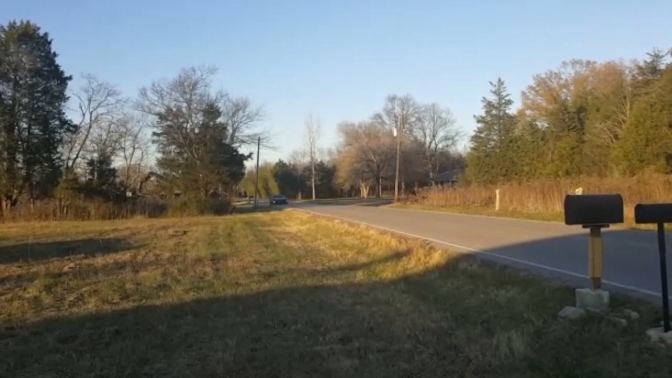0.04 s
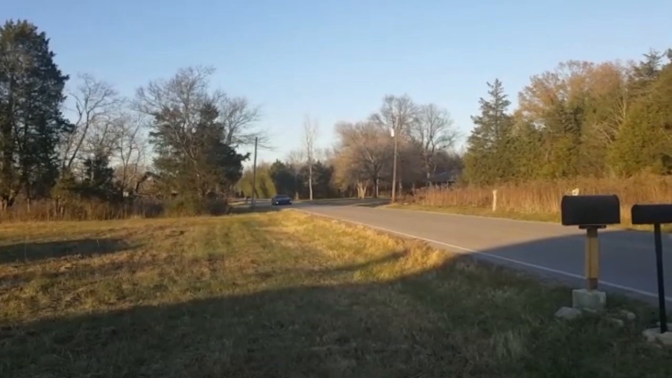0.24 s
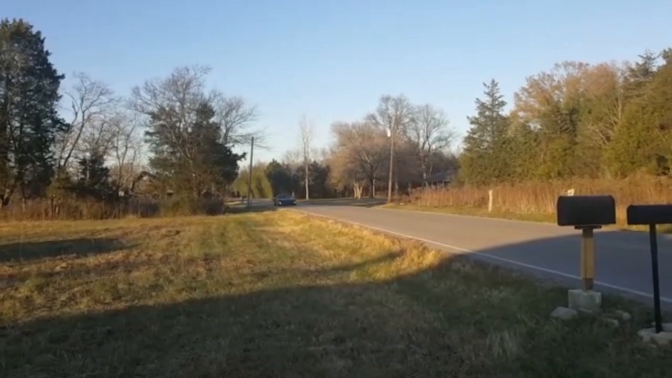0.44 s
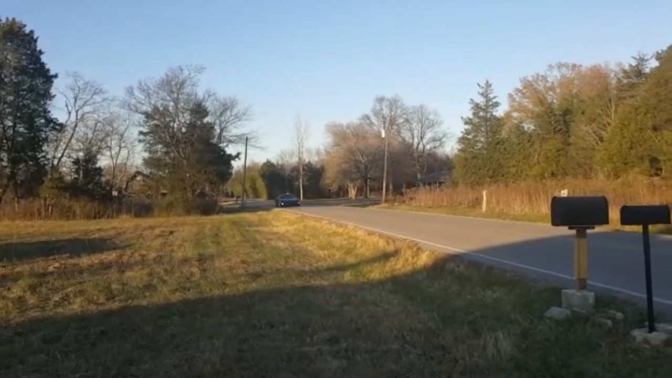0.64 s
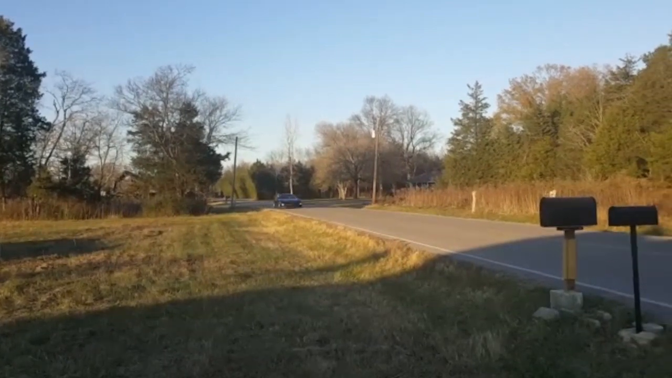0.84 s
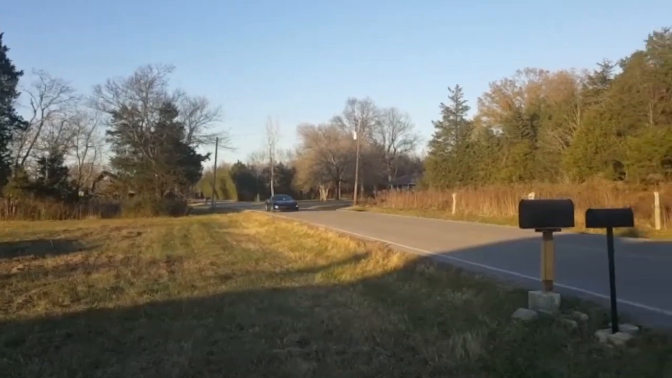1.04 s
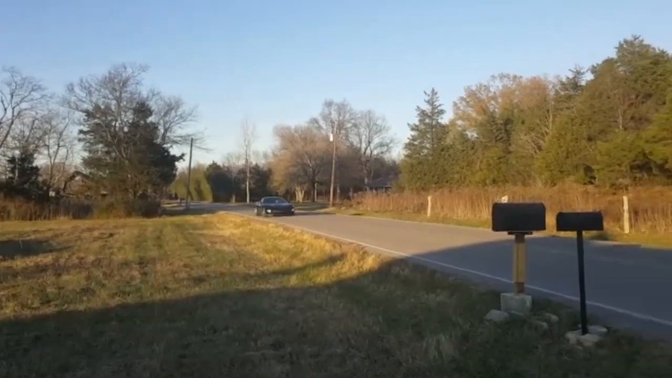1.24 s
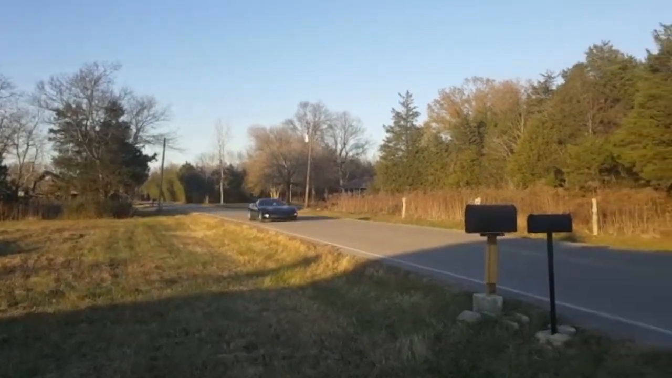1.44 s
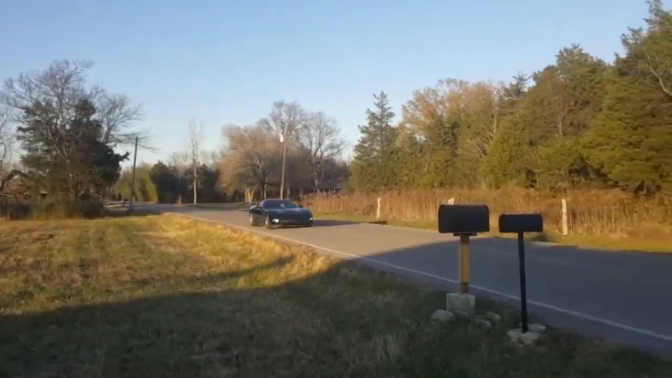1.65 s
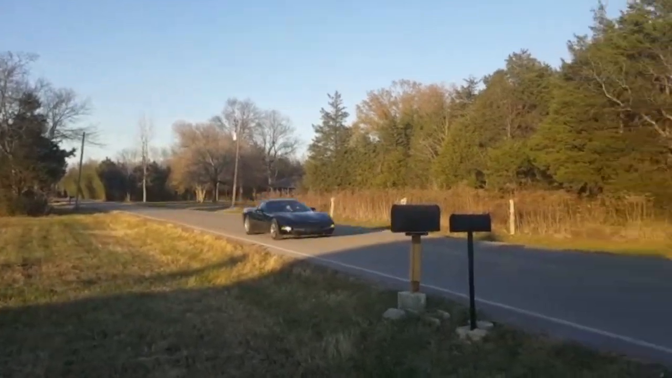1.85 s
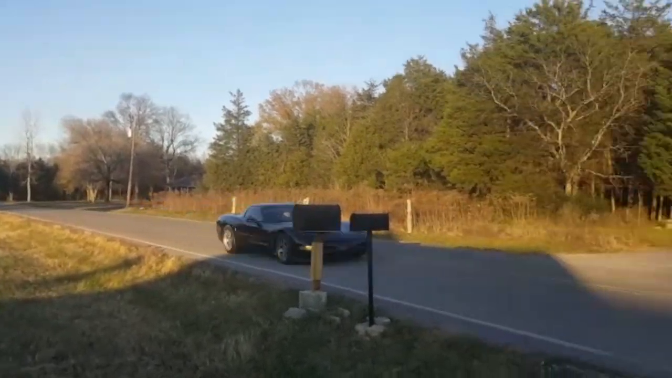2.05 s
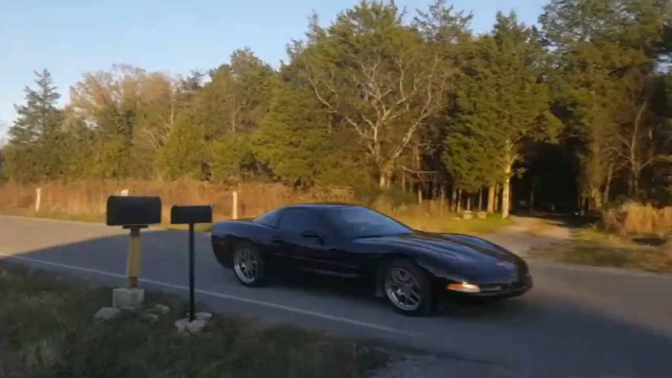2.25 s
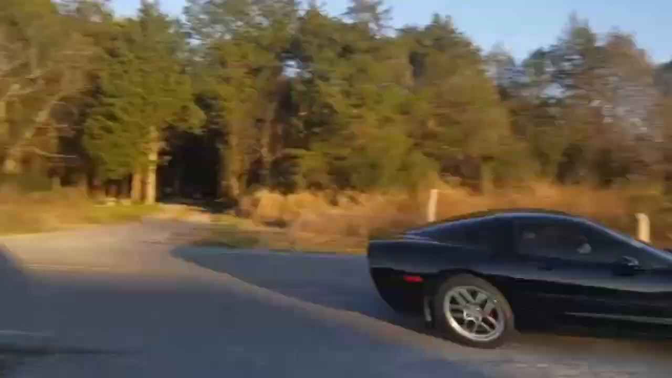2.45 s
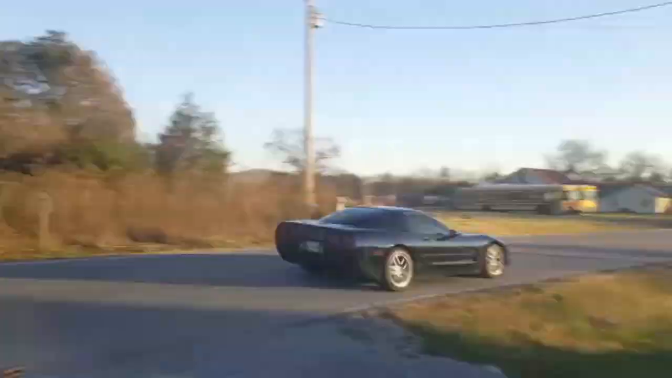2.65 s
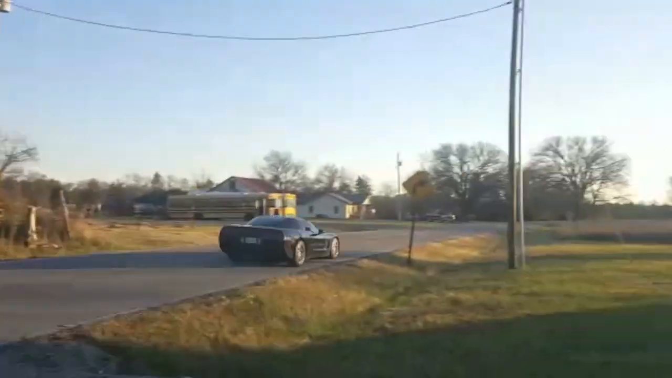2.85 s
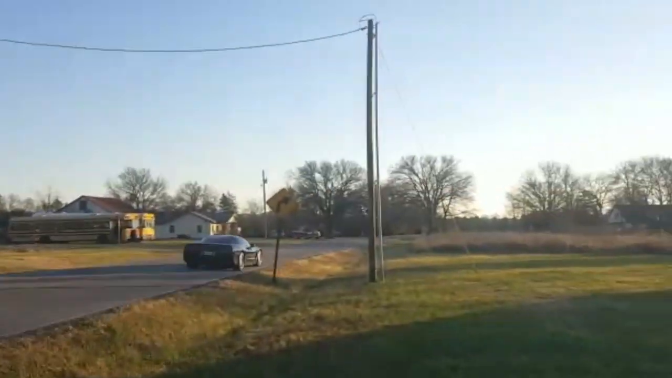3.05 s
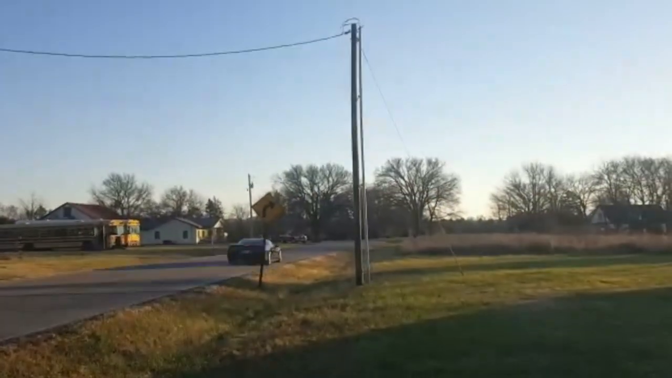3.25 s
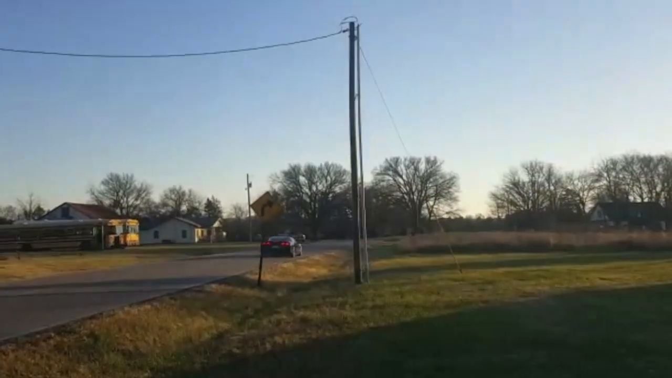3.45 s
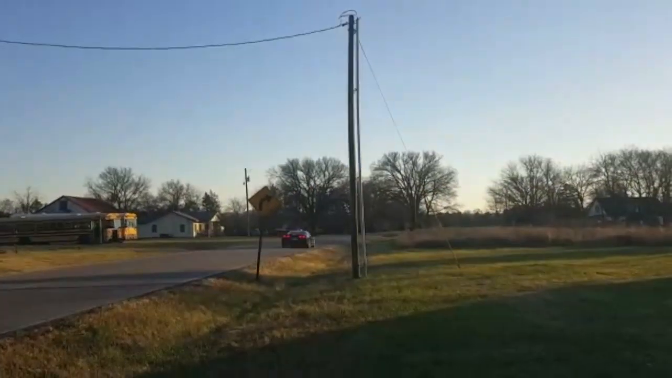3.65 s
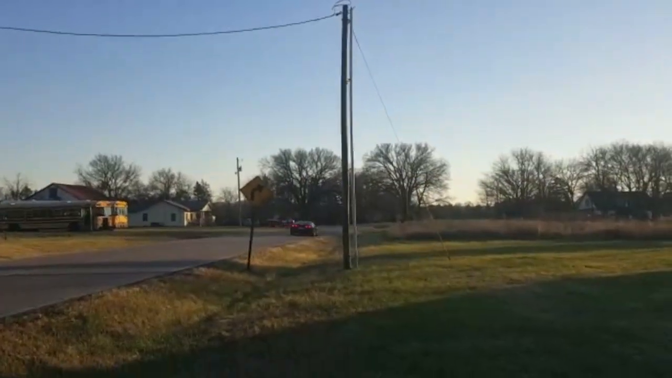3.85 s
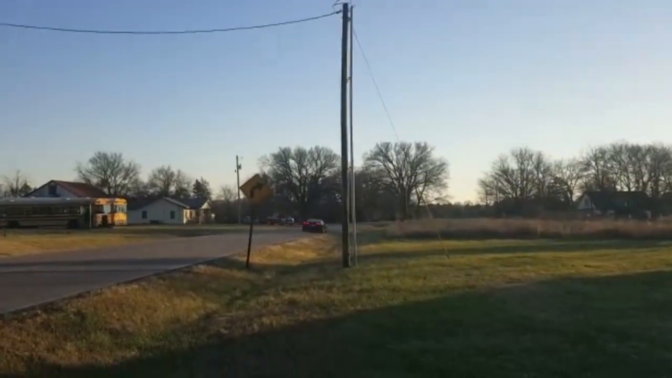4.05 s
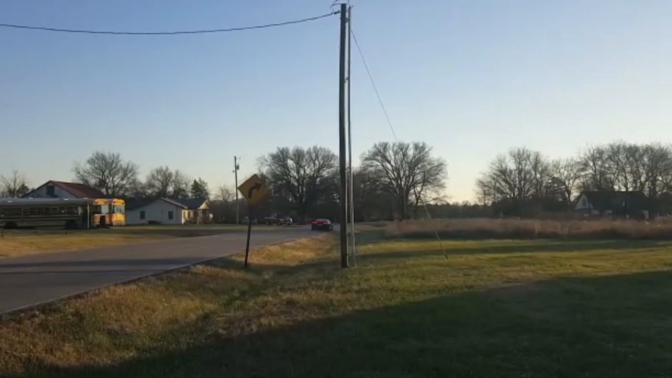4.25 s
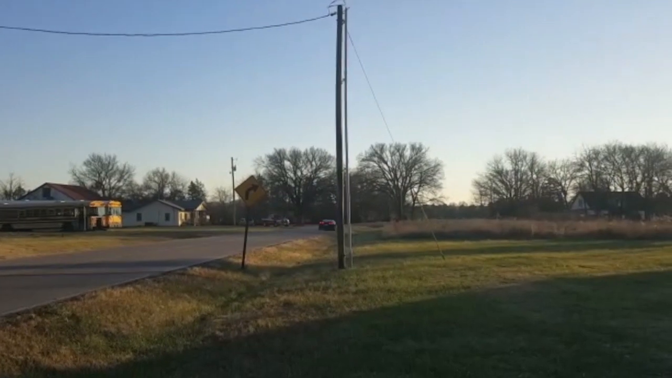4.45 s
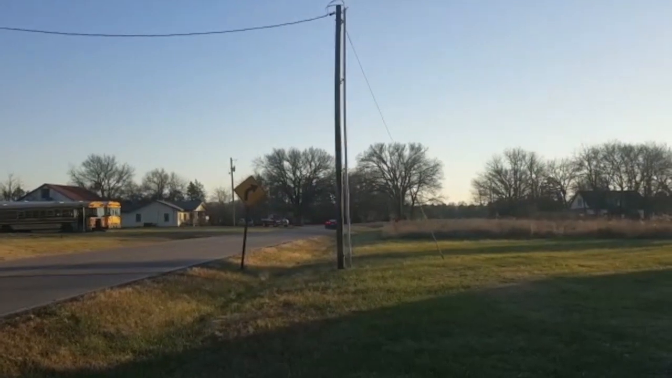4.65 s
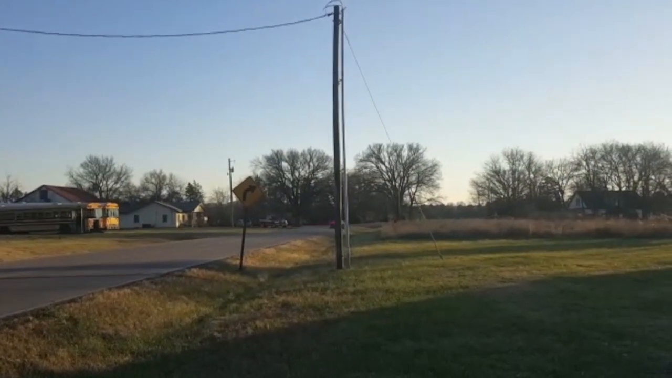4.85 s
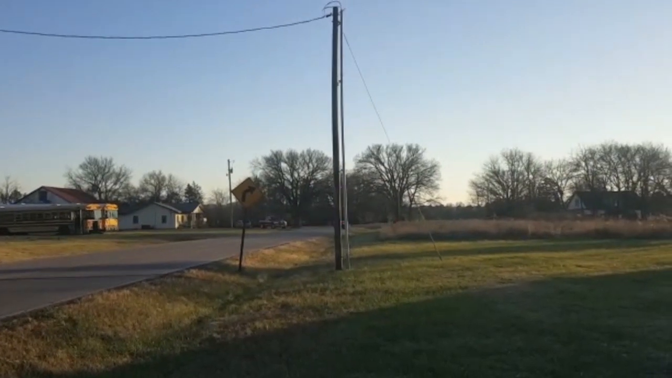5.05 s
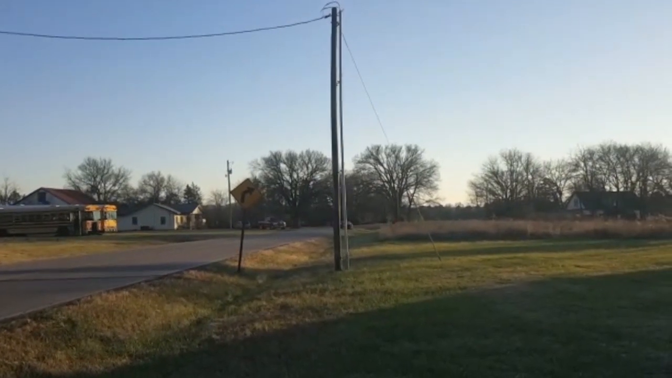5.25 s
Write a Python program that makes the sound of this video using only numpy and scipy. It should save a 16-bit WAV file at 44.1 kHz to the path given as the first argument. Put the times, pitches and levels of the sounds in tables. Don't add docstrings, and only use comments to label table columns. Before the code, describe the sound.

Outdoors on a country road between trees, the first 0.8 seconds hold only faint field air and a very distant low engine hum. At about 0.9 the throttle cracks open with sharp pops, and an unmuffled eight-cylinder exhaust swells, raspy and booming, its pitch climbing. From 1.3 to 2.4 a mid-high howl and thin pure tones sing over the roar. Around 2.5 the car is abreast, very close: a brief bright blast of tyre hiss, wind gust and rumble, with pitch dropping quickly through 2.7. A short dip follows as the throttle shuts, then from 2.9 to 3.8 bright, uneven crackling pops with whistling overtones. Hollow thumps at 3.85 to 3.95 mark the change to coasting. The engine sags into a lower, lumpy burble with soft whistles; a cluster of small hollow pipe knocks comes at 5.0 to 5.3. It remains audible to the end, with dull tree echoes throughout.

```python
import sys
import numpy as np
from scipy import signal
from scipy.fft import rfft, irfft, next_fast_len
from scipy.io import wavfile
from scipy.ndimage import uniform_filter1d

SR = 44100
rng = np.random.default_rng(int(sys.argv[2]) if len(sys.argv) > 2 else 0)


def amplitude_ratio(level_db):
    exponent = np.asarray(level_db, float) / 20
    return 10 ** exponent


def unload_audio(sound):
    columns = np.transpose(np.atleast_2d(sound))
    steps = np.round(np.clip(columns, -1, 1) * 32767)
    wavfile.write(sys.argv[1], SR, steps.astype(np.int16))


N = 234283
SIZE = next_fast_len(N + 4096)
HZ = np.fft.rfftfreq(SIZE, 1 / SR) + 1
SPIKE_S = 2.177

# (time [s], stage [0 pull, 1 close, 2 overrun, 3 coast])
STAGE = [(0, 2), (.8, 2), (.86, 0), (1.8, 0), (2.1, 1), (2.65, 1), (2.85, 2), (3.82, 2), (3.93, 3),
         (5.31, 3)]


def rms_one(x):
    return x / np.sqrt(np.mean(x ** 2) + 1e-20)


def in_time(rows):
    s, *columns = np.transpose(rows)
    return [np.interp(np.arange(N) / SR, s, c) for c in columns]


def by_stage(values):
    return np.interp(in_time(STAGE)[0], np.arange(len(values)), values)


def at_hz(points):
    hz, value = np.transpose(points)
    return np.interp(np.log(HZ), np.log(hz), value)


def colour(x, spectrum, low_hz, high_hz):
    band = 1 / (1 + (low_hz / HZ) ** 16) / (1 + (HZ / high_hz) ** 24)
    shaped = rfft(x, SIZE) * amplitude_ratio(at_hz(spectrum)) * band
    return rms_one(irfft(shaped, SIZE)[..., :N])


def drift(rate):
    steps = rng.standard_normal(400)
    return np.interp(np.arange(N) / SR * rate, np.arange(len(steps)), steps)


def bursts(rows, rise_db_per_s, fall_db_per_s):
    t = np.arange(N) / SR
    gain = 0
    for s, hold, db in rows:
        before, after = np.maximum(s - t, 0), np.maximum(t - s - hold, 0)
        gain = gain + amplitude_ratio(db - rise_db_per_s * before - fall_db_per_s * after)
    return gain


def engine_cycle():
    # (time [s], cycle rate [Hz])
    speed = [(0, 34.13), (.7, 33.64), (.87, 35.55), (.96, 34.85), (1.31, 36.81), (1.9, 39.63), (2.2, 40.93),
             (2.38, 41.19), (2.52, 40.55), (2.69, 35.43), (2.8, 35.75), (2.91, 34.8), (3.45, 34.07),
             (3.85, 33.57), (3.98, 32.6), (4.15, 32.32), (4.57, 30.56), (5.31, 28.38)]
    main_pop_s, coast_step_cycles = 3.2205, .26
    rate, = in_time(speed)
    cycle = np.cumsum(rate) / SR
    cycle -= cycle[round(main_pop_s * SR)]
    return cycle + by_stage([0, 0, 0, coast_step_cycles])


def boom(cycle, bark_db):
    # (multiple of the cycle, level [dB])
    pull = [(1, -43), (2, -20), (3, -13.5), (4, -11), (5, -2), (6, -1.5), (7, -1.5), (8, -1), (9, -39.5),
            (10, -27), (11, -16), (12, -21), (13, -7.5), (14, -22), (15, -35), (16, -11), (17, -26),
            (18, -14), (19, -28), (20, -6), (21, -14), (22, -14.5), (23, -40), (24, -27), (25, -17),
            (26, -13.5), (27, -8), (28, -27), (29, -9.5), (30, -11)]
    close = [(1, -55.5), (2, -26), (3, -16.5), (4, -20.5), (5, -15), (6, -7.5), (7, -19), (8, 0), (9, -15),
             (10, -14.5), (11, -11), (12, -26.5), (13, -20.5), (14, -9), (15, -32), (16, -5.5), (17, -27),
             (18, -26.5), (19, -9.5), (20, -41), (21, -48), (22, -2.5), (23, -11.5), (24, -4.5),
             (25, -22.5), (26, -18), (27, -41), (28, -25), (29, -40), (30, -7.5)]
    overrun = [(1, -46), (2, -40), (3, -12.5), (4, -7.5), (5, -0.5), (6, 0), (7, -6.5), (8, -12),
               (9, -23.5), (10, -14), (11, -28), (12, -23.5), (13, -20), (14, -40), (15, -15.5),
               (16, -12.5), (17, -34.5), (18, -13), (19, -36), (20, -8), (21, -10.5), (22, -8), (23, -13.5),
               (24, -8), (25, -11.5), (26, -17), (27, -33.5), (28, -27), (29, -30), (30, -30)]
    coast = [(1, -37.5), (2, -29), (3, -16.5), (4, -7), (5, -8), (6, 3), (7, -15), (8, 0), (9, -12),
             (10, -28), (11, -53), (12, -17.5), (13, -45.5), (14, -18), (15, -44), (16, -20.5), (17, -33),
             (18, -34.5), (19, -18), (20, -38.5), (21, -12), (22, -21), (23, -15), (24, -22.5), (25, -21),
             (26, -17), (27, -29), (28, -17.5), (29, -15), (30, -36)]
    # (time [s], burble of uneven firing [dB], even firing tone [dB])
    boom_levels = [(0, -47.5, -70), (.8, -37.5, -65), (.9, -32, -29.5), (1.28, -23.5, -29.5),
                   (1.74, -22.5, -19.5), (1.94, -21.5, -15), (2.14, -26, -13), (2.34, -28, -20),
                   (2.45, -29.5, -7), (2.69, -27.5, -10), (2.8, -20.5, -29), (3.12, -25.5, -46.5),
                   (3.45, -21, -30), (3.85, -20, -36), (4.1, -21.5, -18), (4.64, -20, -16.5),
                   (5.1, -23, -12), (5.31, -27, -17)]
    low_trim = [-2.5, -3.5, -0.5, -0.5]
    high_trim = [-5.5, -3.5, -6, 4]
    # (time [s], level [dB])
    facing = [(2.36, -8.5), (2.5, 12), (2.85, 8.5), (3.0, 0)]
    scattering = [.9, .9, 0, np.pi / 2]
    spiking = [1, 1, 0, 0]
    ringing_out = [1, 1, 1, 0]
    # (time [s], half length [s], level [dB])
    order_swells = [(0.51, 0.43, -18), (3.04, 0.096, 5), (5.07, 0.34, -6.5), (5.7, 0.39, 13.5),
                    (0.84, 0.8, 11.5), (2.35, 0.08, 10.5), (2.36, 0.068, 10), (2.54, 0.046, 13),
                    (2.81, 0.07, 15.5), (2.55, 0.037, -3.5), (2.61, 0.0075, 5.5), (2.66, 0.0081, -5.5),
                    (2.78, 0.015, -12), (2.62, 0.031, -7), (2, 0.012, -12), (4.1, 0.071, -8.5),
                    (2.78, 0.041, -9), (2, .06, -3), (2.11, 0.043, 6.5), (2.38, .08, -7.5),
                    (2.435, 0.018, -4.5), (2.42, .04, 9.5), (2.21, 0.2, 3), (2.2, 0.15, 3), (2.48, .02, 7.5)]
    swelling_orders = [6, 6, 6, 5, 16, 16, 24, 24, 7, 8, 8, 8, 8, 22, 16, 14, 10, 11, 22, 22, 24, 19, 16,
                       24, 24]

    tables = np.array([pull, close, overrun, coast])
    burble_db, firing_db = in_time(boom_levels)
    burble_db = burble_db - by_stage(tables[:, 4:6, 1].mean(axis=1))
    low_db, high_db = burble_db + by_stage(low_trim), bark_db + by_stage(high_trim)
    facing_db, spread = in_time(facing)[0], by_stage(scattering)
    in_step, ring_out = by_stage(spiking), by_stage(ringing_out)
    unsteady = by_stage([.5, .4, 1, .6])
    t, spike_at, out = np.arange(N) / SR, round(SPIKE_S * SR), np.zeros(N)
    for k in range(1, tables.shape[1] + 1):
        own_db = by_stage(tables[:, k - 1, 1])
        if k == 8:
            level_db = firing_db + .9 * drift(25)
        elif k in (5, 6):
            level_db = own_db + burble_db + .9 * drift(25)
        else:
            guide_db = low_db if k <= 12 else high_db
            level_db = own_db + guide_db + (2.74 if k % 8 else 1.1) * unsteady * drift(14)
        for order, (s, half, db) in zip(swelling_orders, order_swells):
            if order == k:
                level_db += db * np.exp(-((t - s) / half) ** 2)
        level_db += facing_db * (9 <= k <= 13 or k == 19)
        ringing = ring_out * np.arctan((k - 5.4) / .35) + spread * (min(k, 9) - 6) ** 2
        ringing += (1 - ring_out) * (2 * np.pi * k * .07 - np.pi)
        scramble = (k > 12) * k ** 2
        slip = 0.0074 * k * drift(20) + scramble
        if k >= 8:
            spike = 2 * np.pi * k * cycle[spike_at] + scramble
            ringing += in_step * ((spike - ringing[spike_at] + np.pi) % (2 * np.pi) - np.pi)
        out += np.sqrt(2) * amplitude_ratio(level_db) * np.cos(2 * np.pi * k * cycle - ringing + slip)
    return out


def blowdown(cycle):
    # (place [0-1], level in pull, close, overrun, coast [dB])
    pops = [
        (0, -1.5, -3, 0, 0),
        (.125, -4, -4, -14, -11),
        (.22, -3, -3, -6, -5),
        (.375, -4, -4, -13, -10),
        (.53, -1.5, -3, -7, -2),
        (.64, -4, -4, -12, -9),
        (.78, -4, -3, -10, -5),
        (.875, -4, -4, -14, -9),
    ]
    scatter = [1.2, 1.2, 1.2, 2.5]
    # (time [s], level over the main pop [dB])
    stray_pops = [
        (.884, 11),
        (.912, 8),
        (.916, 8),
        (3.293, -1),
        (3.3435, -1),
        (3.2205, 2),
        (3.944, 6),
        (4.0656, 1),
        (4.1574, 2),
    ]
    # (time [s], share [0-1])
    pop_share = [(0, .1), (.85, .1), (.9, .65), (2.6, .6), (2.95, .8), (3.8, .75), (3.95, .6), (4.5, .5),
                 (5.1, .55), (5.31, .55)]
    clicks = np.zeros(N)
    turns = np.arange(int(cycle[0]) + 1, int(cycle[-1]))
    chance = rng.standard_normal((len(pops), len(turns), 2))
    for (place, *stage_db), luck in zip(pops, chance):
        at = np.searchsorted(cycle, turns + place + .0015 * luck[:, 0])
        clicks[at] += amplitude_ratio(by_stage(stage_db)[at] + by_stage(scatter)[at] * luck[:, 1])
    for s, level_db in stray_pops:
        clicks[round(s * SR)] += amplitude_ratio(level_db)
    fade = np.exp(-1 / (.0011 * SR))
    puffs = signal.lfilter([1], [1, -fade], clicks) * .6 * rng.standard_normal((2, N))
    puffs = puffs + 3.2 * clicks
    swing = 1.2 * drift(5)
    for weight in (np.cos(swing), np.sin(swing)):
        scattered = .6 * rng.standard_normal(200) * fade ** np.arange(200)
        puffs += np.convolve(clicks * weight, scattered)[:N]
    even = np.sqrt(uniform_filter1d(puffs[0] ** 2, size=6000))
    bright = signal.lfilter(*signal.butter(2, [3000, 15000], "band", fs=SR), puffs)
    puffs = bright + by_stage([.3, .3, .1, .9]) * puffs
    share = in_time(pop_share)[0]
    turbulence = rng.standard_normal((2, N))
    return np.sqrt(share) * puffs / (even + 1e-9) + np.sqrt(1 - share) * turbulence


def roar(gas, *bands_db):
    # (frequency [Hz], level [dB per Hz])
    front = [(180, -35), (300, 12.5), (331, 5), (354, -7), (398, -25.5), (633, -11.5), (1360, -11.5),
             (1550, -10.5), (1660, -9.5), (2640, -21.5), (3490, -30), (5000, -36.5), (8280, -55.5),
             (9200, -54.5), (10600, -66), (11900, -49), (15800, -62)]
    rear = [(180, -31.5), (300, -25.5), (391, 11), (447, -11), (699, -8), (1080, -1), (1470, -5.5),
            (1770, -6), (2110, -5), (3060, -9.5), (4200, -15.5), (5000, -23.5), (6300, -29.5),
            (7130, -42.5), (8280, -36), (9200, -54.5), (10400, -71.5), (15800, -59)]
    behind = np.clip(in_time(STAGE)[0] - 1, 0, 1)
    edges_hz, out = [(420, 2050), (2250, 6900), (6900, 9400)], 0
    for (low, high), level_db in zip(edges_hz, bands_db):
        blend = (1 - behind) * colour(gas, front, low, high) + behind * colour(gas, rear, low, high)
        out = out + amplitude_ratio(level_db - 0.5 + 1.74 * drift(13) + 1.0 * drift(40)) * blend
    return out


def crackle(cycle, rasp_db, distance_m):
    # (place [0-1], level [dB], scatter [dB])
    fronts = [
        (0, 0, 1.3),
        (.21, -6, 2.5),
        (.5, -10, 3.5),
    ]
    pitches = [3300, 3900, 4500, 5300]
    over_rasp = [-30, 0, 14.5, -4]
    fade_s, air_db_per_m = .00045, .09
    level_db = rasp_db + by_stage(over_rasp) - air_db_per_m * distance_m
    turns = np.arange(int(cycle[0]) + 1, int(cycle[-1]))
    clicks = np.zeros((len(pitches), N)) + 1e-18
    for place, db, scatter_db in fronts:
        luck = rng.standard_normal((len(turns), 2))
        at = np.searchsorted(cycle, turns + place + .04 * place * luck[:, 1])
        clicks[rng.integers(0, len(pitches), len(turns)), at] = amplitude_ratio(db + scatter_db * luck[:, 0])
    r, rung = np.exp(-1 / (fade_s * SR)), 0
    for hz, pitch_clicks in zip(pitches, clicks):
        w = 2 * np.pi * hz / SR
        rung = rung + signal.lfilter([0, np.sin(w)], [1, -2 * r * np.cos(w), r * r], pitch_clicks)
    strong = np.maximum(clicks.sum(axis=0) - .4, 1e-18)
    top = signal.sosfilt(signal.butter(2, [5000, 9300], "band", fs=SR, output="sos"), strong)
    return amplitude_ratio(level_db) * signal.sosfilt(signal.butter(8, 9000, fs=SR, output="sos"), rung + top)


def pipe_ring(rows, hz, t60, trim_db, band_hz):
    clicks = np.zeros(N)
    for s, peak_db in rows:
        clicks[round(s * SR)] = amplitude_ratio(peak_db + trim_db)
    r, w = amplitude_ratio(-60 / (t60 * SR)), 2 * np.pi * hz / SR
    rung = signal.lfilter([0, np.sin(w)], [1, -2 * r * np.cos(w), r * r], clicks + 1e-18)
    return signal.sosfilt(signal.butter(2, band_hz, "band", fs=SR, output="sos"), rung)


def misfires():
    # (time [s], peak [dB])
    thumps = [
        (2.642, -7),
        (3.845, -0.5),
        (3.882, 0.5),
        (3.925, -21),
        (3.944, -9),
    ]
    return pipe_ring(thumps, hz=228.7, t60=0.14, trim_db=-7.5, band_hz=[130, 900])


def knocks():
    # (time [s], peak [dB])
    blows = [
        (4.451, -17),
        (5.014, -18),
        (5.033, -13),
        (5.045, -12),
        (5.066, -16),
        (5.083, -9),
        (5.119, -11),
        (5.153, -13),
        (5.189, -17),
        (5.274, -16),
    ]
    return pipe_ring(blows, hz=1110, t60=0.013, trim_db=-4, band_hz=[500, 3000])


def howl(gas, rows, width_hz):
    first, last = rows[0], rows[-1]
    rows = [(first[0] - .15, first[1], -70), *rows, (last[0] + 0.13, last[1], -70)]
    span = slice(round(rows[0][0] * SR), round(rows[-1][0] * SR))
    hz, level_db = (c[span] for c in in_time(rows))
    turn = np.exp(2j * np.pi * np.cumsum(hz) / SR)
    r = np.exp(-np.pi * width_hz / SR)
    rung = np.real(turn * signal.lfilter([1], [1, -2 * r, r * r], gas[:, span] / turn))
    flutter_db = 3 * min(width_hz / 600, 1) * drift(25)[span]
    out = np.zeros((2, N))
    out[:, span] = amplitude_ratio(level_db - 5.0 + flutter_db) * rms_one(rung)
    return out


def howls(gas):
    # (time [s], frequency [Hz], level [dB])
    resonances = [
        [(1.3, 1535, -34), (1.5, 1444, -27), (1.62, 1520, -20.5), (2.0, 1540, -23.5), (2.06, 1507, -28),
         (2.12, 1520, -28.5), (2.3, 1534, -22), (2.45, 1525, -21)],
        [(2.46, 3840, -35.5), (2.51, 3530, -17.5), (2.56, 2930, -24.5), (2.6, 2460, -25)],
        [(2.86, 1000, -37.5), (2.9, 1000, -25.5), (3.1, 935, -35.5)],
        [(2.98, 4430, -46), (3.06, 4090, -34.5), (3.2, 4330, -31.5), (3.29, 3808, -33.5), (3.45, 3700, -39),
         (3.6, 4080, -28.5), (3.72, 4400, -29.5), (3.83, 4040, -29)],
        [(3.95, 4260, -34), (4.07, 3670, -26.5), (4.2, 4470, -44), (4.4, 4120, -45.5), (4.72, 4250, -42.5),
         (5.05, 4320, -53)],
        [(4.05, 1700, -36.5), (4.3, 1756, -32.5), (4.62, 1640, -36.5), (4.75, 1660, -46), (5.0, 1805, -33),
         (5.13, 1780, -27)],
        [(4.95, 682, -39), (5.1, 670, -25), (5.27, 637, -30)],
        [(3.4, 1756, -33), (3.65, 1750, -19.5), (3.812, 1696, -25.5), (3.86, 1580, -27)],
    ]
    ring = [(3.05, 3100, -47.5), (3.2, 3200, -50), (3.45, 3180, -48), (3.7, 3110, -25.5),
            (3.871, 3240, -30.5), (3.9, 3050, -34), (4.2, 3050, -32.5), (4.55, 3030, -37),
            (5.099, 3100, -42)]
    swell = [(4.75, 1010, -46), (5.001, 983, -27.5), (5.12, 1020, -22.5), (5.28, 907, -34)]
    drone = [(3.0, 2440, -41), (3.22, 2600, -34), (3.4, 2550, -46.5), (3.65, 2600, -33.5),
             (3.85, 2450, -35.5), (4.1, 2320, -36), (4.5, 2300, -37), (4.9, 2400, -40.5)]
    widths = [75, 900, 350, 1500, 1300, 280, 260, 300, 600, 450, 350]
    return sum(howl(gas, rows, width) for rows, width in zip([*resonances, ring, swell, drone], widths))


def singing(cycle):
    # (time [s], half length [s], level [dB])
    moments = [(1.86, .14, -24), (1.96, .16, -27), (1.96, .08, -21), (2.145, .04, -19), (4.2, .15, -28),
               (1.34, .05, -31), (1.36, .08, -31), (1.62, .1, -27), (1.9, .12, -31), (1.93, .1, -35),
               (2.15, .08, -36), (2.36, .04, -28), (2.27, .04, -24), (1.7, .15, -29), (.55, .12, -52),
               (.5, .1, -52), (.45, .06, -56), (.88, .05, -37)]
    orders = [30, 32, 38, 38, 22, 48, 28, 40, 46, 64, 56, 35, 38, 38, 14, 16, 27, 16]
    t, out = np.arange(N) / SR, np.zeros(N)
    since_spike = cycle - cycle[round(SPIKE_S * SR)]
    for order, (s, half, db) in zip(orders, moments):
        swelling = np.exp(-((t - s) / half) ** 2)
        out += np.sqrt(2) * amplitude_ratio(db) * swelling * np.cos(2 * np.pi * order * since_spike)
    return out


def sizzle(gas, rasp_db):
    under_rasp = [-36, -32.5, -63, -62]
    # (time [s], hold [s], level [dB])
    whooshes = [
        (2.47, .125, -33.5),
        (3.78, 0.19, -76),
    ]
    gain = amplitude_ratio(rasp_db + by_stage(under_rasp)) + bursts(whooshes, rise_db_per_s=150, fall_db_per_s=601)
    top = [(9400, -4), (10100, -22), (11200, 0), (16000, 0)]   # Hz, dB
    return gain * amplitude_ratio(1.5 * drift(53)) * colour(gas, top, 9300, 17000)


def tyres():
    # (time [s], hold [s], level [dB])
    roars = [
        (2.46, 0.098, -27),
    ]
    noise = colour(rng.standard_normal((2, N)), [(2500, 0.5), (5000, -7), (9000, -10)], 2500, 9800)
    return bursts(roars, rise_db_per_s=120, fall_db_per_s=500) * noise


def rumble(bark_db):
    under_bark = [-19, -29, -23.5, -28.5]
    # (time [s], hold [s], level [dB])
    gusts = [
        (.92, 0.031, -46.5),
        (2.495, 0.012, -24),
        (2.66, 0.007, -37.5),
        (3.82, 0.085, -46.5),
        (5.29, .03, -40),
    ]
    shape = [(25, -28.0), (60, -7), (100, 3), (250, 14.0), (450, -0.5)]   # Hz, dB
    low = colour(rng.standard_normal(N), shape, 28, 544)
    far_road_db = -59.5
    gain = amplitude_ratio(far_road_db) + amplitude_ratio(bark_db + by_stage(under_bark))
    gain = gain + bursts(gusts, rise_db_per_s=292.5, fall_db_per_s=198.5)
    return amplitude_ratio(12.5) * gain * low


def tree_lines(x):
    # (delay [s], level [dB])
    echoes = [
        (.045, -20),
        (.11, -34.5),
        (.19, -22.5),
        (0.332, -19),
    ]
    dull, out = signal.lfilter([.3], [1, -.7], x), x.copy()
    for s, level_db in echoes:
        lag = round(s * SR)
        out[:, lag:] += amplitude_ratio(level_db) * dull[:, :-lag]
    return out


def ports(pair):
    # (frequency [Hz], level difference [dB])
    balance = [(60, 1), (99, -0.5), (160, -1), (270, 0.5), (450, 0), (740, 0.5), (1220, 2.5), (2010, 5.5),
               (3330, -4), (5500, -13), (9080, 0.5), (15000, -5)]
    # (frequency [Hz], phase difference [rad])
    phase = [(60, 0), (1460, .5), (4130, .8), (4910, -2.6), (6550, -6), (9040, -12), (15500, -19)]
    # (frequency [Hz], likeness, clipped to .3-.99)
    likeness = [(60, 4), (130, 6.5), (290, 1.1), (640, 0.95), (1410, 0.9), (3100, 0.9), (6820, -4.5),
                (15000, 0)]
    smear = rfft(rng.standard_normal(300) * np.exp(-np.arange(300) / 18), SIZE)
    alike = np.clip(at_hz(likeness), .3, .99)
    half = amplitude_ratio(at_hz(balance) / 2) * np.exp(.5j * at_hz(phase))
    common, other = rfft(pair, SIZE)
    mid = np.sqrt((1 + alike) / 2) * common
    apart = np.sqrt((1 - alike) / 2) * 1j * smear / np.abs(smear) * other
    return irfft(np.array([(mid + apart) * half, (mid - apart) / half]), SIZE)[:, :N]


def field_floor():
    # (frequency [Hz], level [dB])
    spectrum = [(15, -54.5), (25, -18), (174, 1.5), (382, -18.5), (604, -10), (1780, -36.5), (2270, -20.5),
                (8270, -54.5), (9470, -52.5), (15800, -51)]
    return amplitude_ratio(-36 - 2.5 + 2.0 * drift(10)) * colour(rng.standard_normal((2, N)), spectrum, 20, 16000)


def scene():
    # (time [s], effort [dB], sharpness of the pulse edges [dB])
    gas_flow = [(0, -57, -44), (.84, -49, -10), (.92, -29.5, -6.5), (1.08, -23.5, -7), (1.35, -19.5, -1),
                (1.86, -15, -3), (2.19, -20, -3.5), (2.38, -17, -5), (2.6, -14.5, 0.5), (2.625, -20.5, -5),
                (2.73, -32.5, -1.5), (2.99, -21.5, -6), (3.36, -26, 1), (3.84, -22, -1.5),
                (3.9, -26.5, -8.5), (4.12, -27, -3), (4.9, -27, -11), (5.31, -27.5, -12.5)]
    bark_trim = [1, 0.5, 0.5, -1.5]
    # (time [s], level difference [dB])
    bearing = [(0, -1.5), (1.2, 1.0), (2.2, 1.2), (2.7, 0), (3.2, 0.3), (5.31, 1.3)]
    pass_s, car_m_per_s, kerb_m = 2.56, 67, 1.6
    distance_m = np.hypot(kerb_m, car_m_per_s * (np.arange(N) / SR - pass_s))
    bark_db, edge_db = in_time(gas_flow)
    rasp_db = bark_db + edge_db
    hiss_db = rasp_db - 15 - 0.07 * distance_m
    cycle = engine_cycle()
    gas = blowdown(cycle)
    car = boom(cycle, bark_db) + singing(cycle) + crackle(cycle, rasp_db, distance_m) + rumble(bark_db)
    car += misfires() + knocks()
    car = car + roar(gas, bark_db + by_stage(bark_trim), rasp_db, hiss_db)
    car = car + sizzle(gas, rasp_db) + tyres() + howls(gas)
    bearing_db = in_time(bearing)[0] * [[.5], [-.5]]
    return ports(tree_lines(car)) * amplitude_ratio(bearing_db) + field_floor()


def band_limit(x):
    return signal.sosfilt(signal.butter(12, 15960, fs=SR, output="sos"), x)


def record(dry):
    mix = 1.069 * np.tanh(dry / 1.17)
    return band_limit(mix)


dry = scene()
out = record(dry)
unload_audio(out)
```